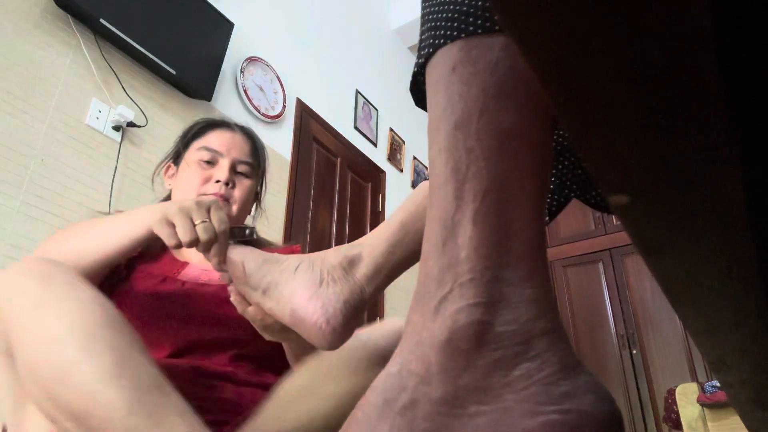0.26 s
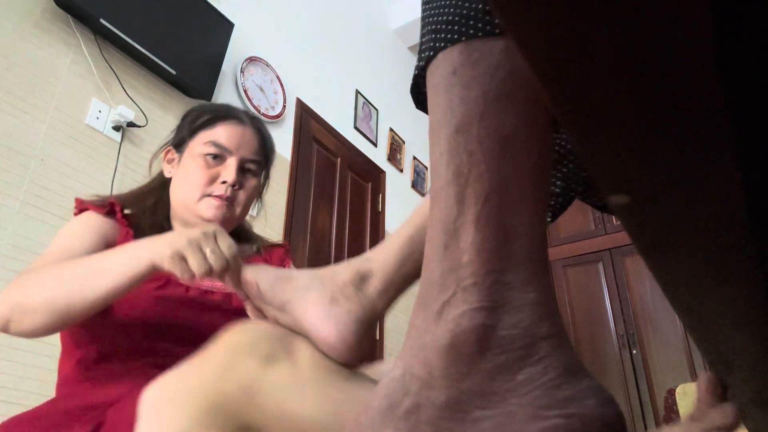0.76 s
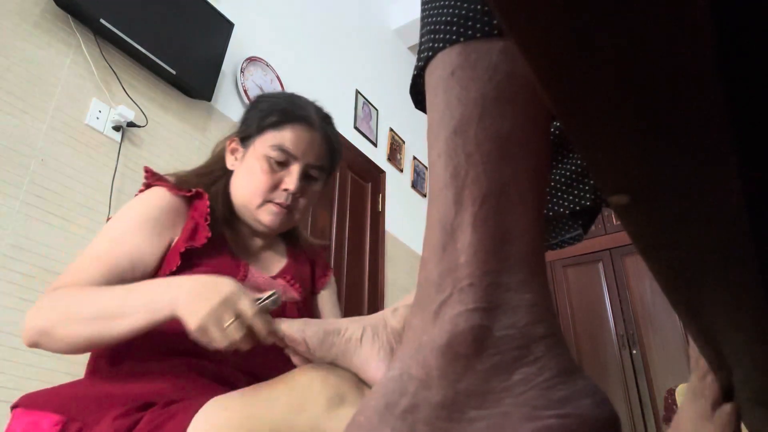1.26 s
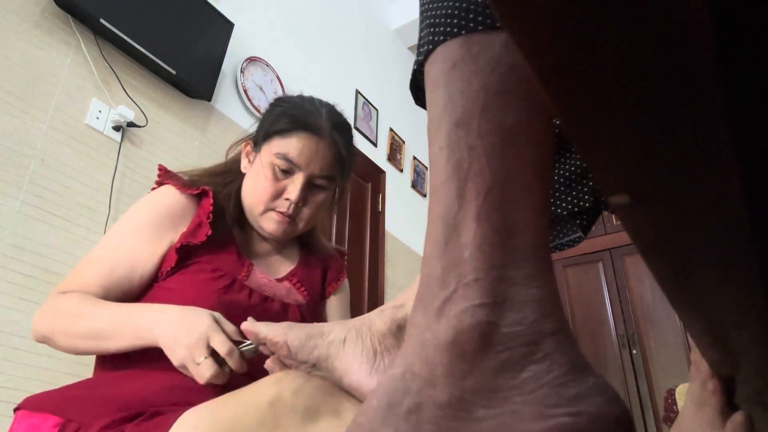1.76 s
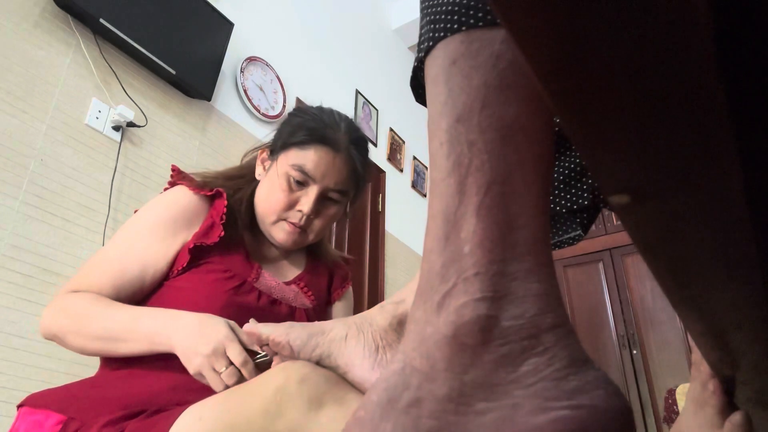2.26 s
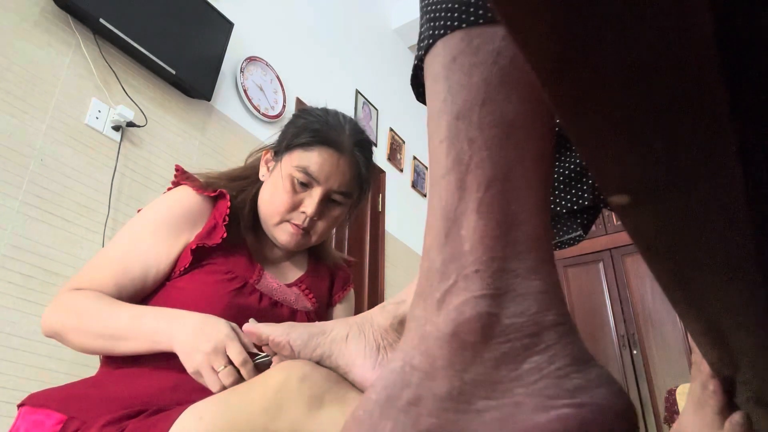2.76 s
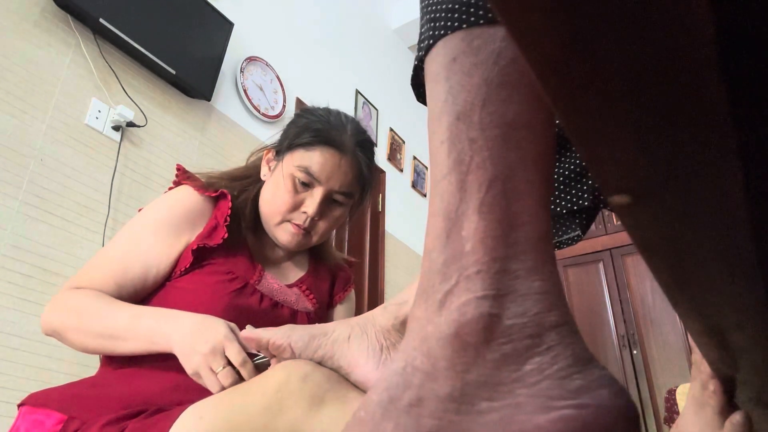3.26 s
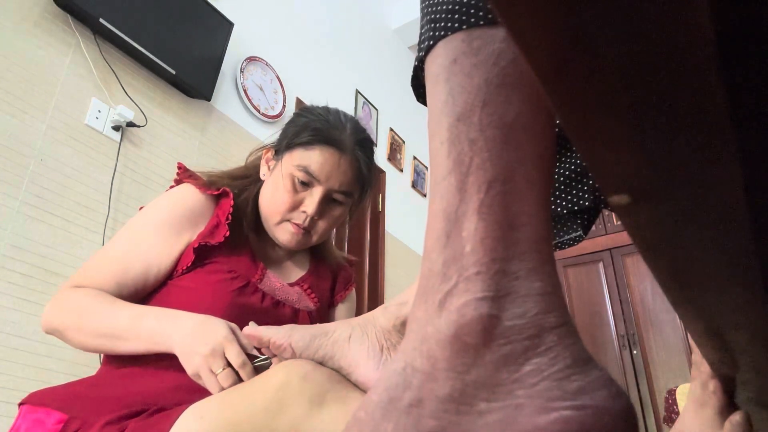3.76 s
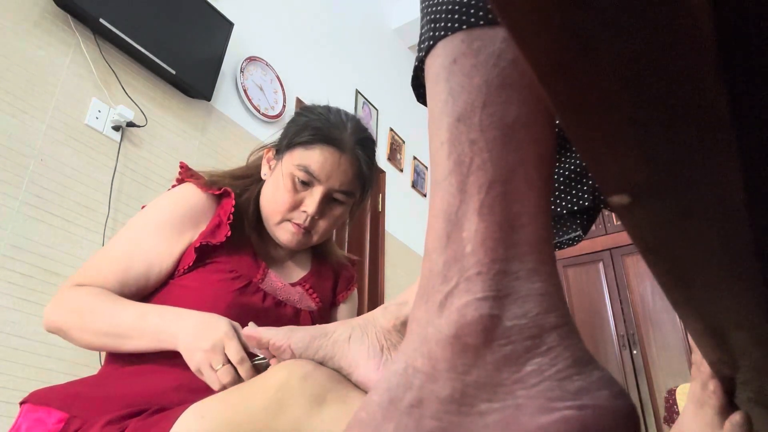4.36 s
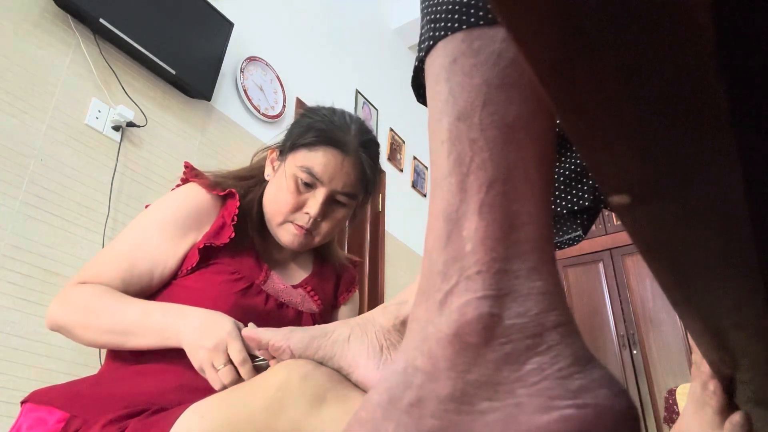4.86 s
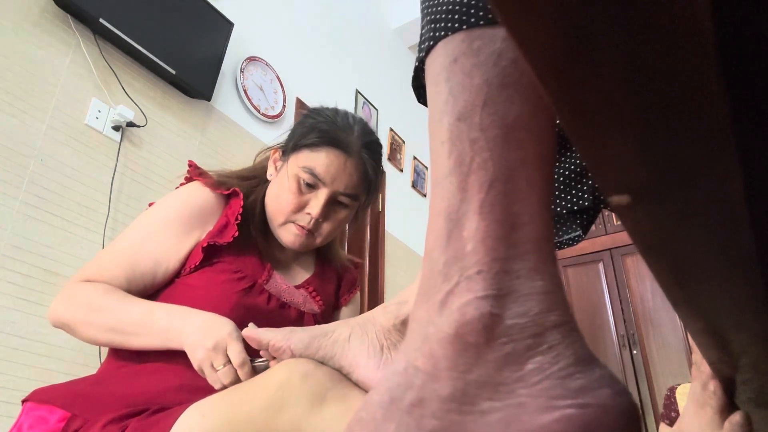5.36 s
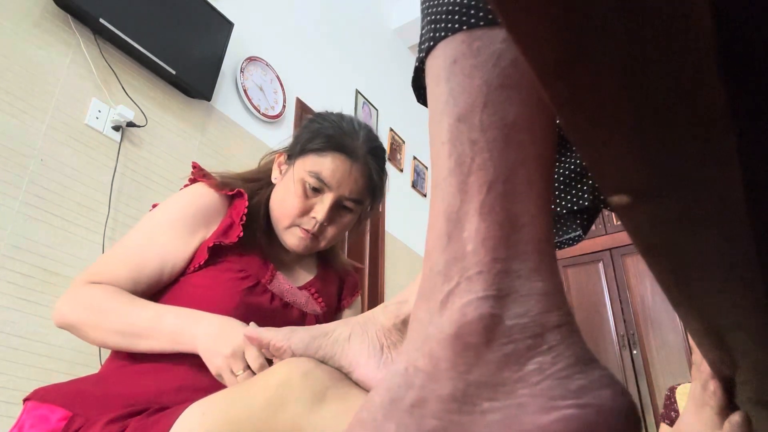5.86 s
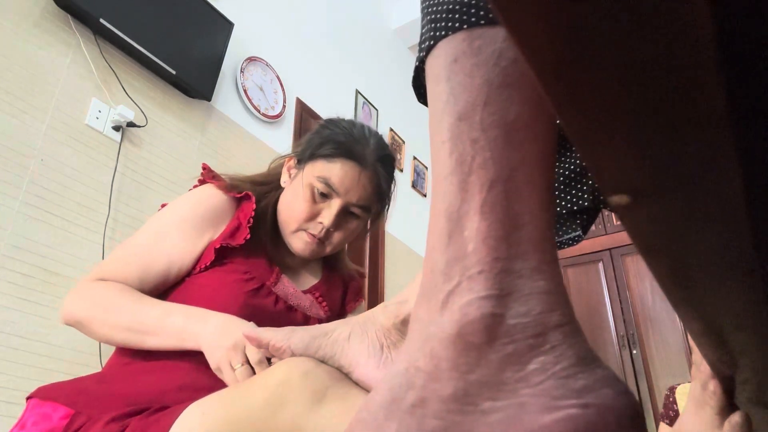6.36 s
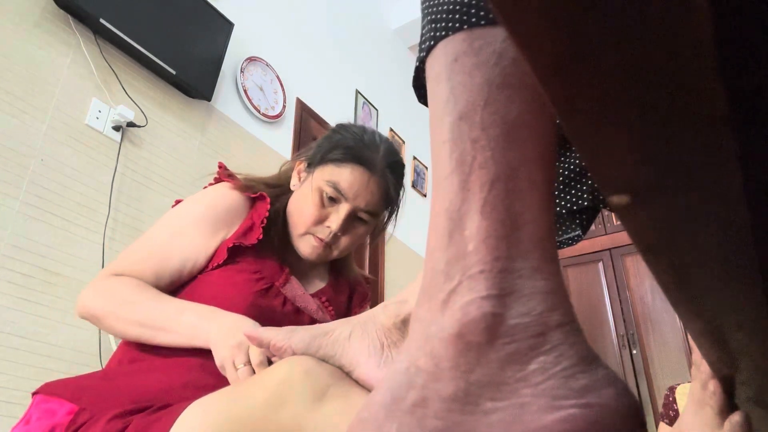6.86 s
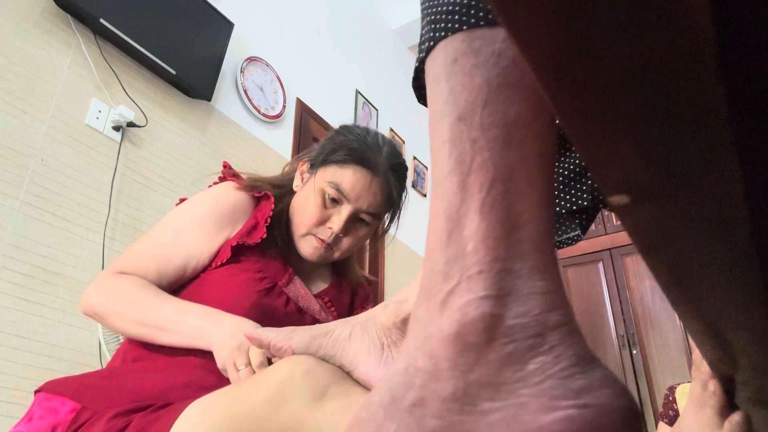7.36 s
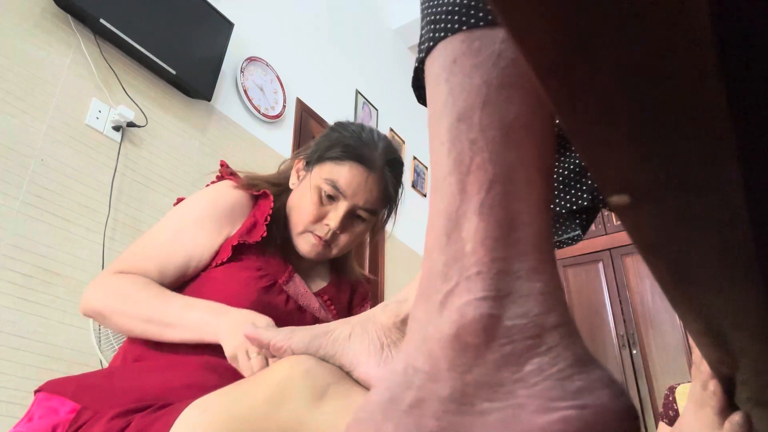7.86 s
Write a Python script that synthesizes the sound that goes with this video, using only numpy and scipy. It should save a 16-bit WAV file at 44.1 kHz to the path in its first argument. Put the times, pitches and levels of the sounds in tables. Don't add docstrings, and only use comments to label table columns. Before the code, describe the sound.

Quiet indoor stereo pickup at floor level: steady fan hum with soft airflow, a wavering pump note and far engines coming and going. Brief cloth rustle and a tiny tick open it. A long calm follows as a lorry's low boom builds outside, then a single dry, piercing snip of toenail clippers dominates everything, its bright reflections fading within about half a second. Low humming remains to the end.

```python
import sys
import numpy as np
from scipy import signal
from scipy.fft import rfft, irfft, next_fast_len
from scipy.io import wavfile
from scipy.ndimage import uniform_filter1d

SR = 44100
rng = np.random.default_rng(int(sys.argv[2]) if len(sys.argv) > 2 else 0)


def boost_factor(decibels):
    exponent = np.asarray(decibels, float) / 20
    return 10 ** exponent


def to_wav(sig):
    pcm = np.clip(np.atleast_2d(sig), -1, 1) * 32767
    pcm = np.round(pcm).astype(np.int16)
    wavfile.write(sys.argv[1], SR, pcm.T)


N = 357410
M = next_fast_len(N, real=True)
HZ = np.arange(M // 2 + 1) * SR / M + 1e-3
T = np.arange(N) / SR

# [f/Hz, likeness 0-1, left minus right/dB, left lead/rad]
PORTS = [(40, 0.95, -1.5, .05), (150, 0.61, -1, 0.46), (305, 0.78, 7.5, 0.82), (560, 0.36, -4.5, 1.14),
         (1300, 0.46, 1.6, 2.09), (2250, 0.4, 0.2, 2.22), (3320, 0.45, -3.5, 5.2), (4550, 0.09, -1.5, 8.4),
         (5840, 0.55, -1.5, 10.06), (7440, 0.71, 5, 8.9), (10220, 0.55, -1.5, 10.75),
         (11560, 0.87, 3, 12.04), (13900, 0.9, -1, 12.5), (15500, .97, 10, 12)]

PUMP_HZ, PUMP_DB, PUMP_OVERTONE_DB = 215.5, -60.5, -75
PUMP_SURGES = [(.3, 0.27, .3, -57), (.88, .12, 0.062, -54), (1.33, .12, .06, -54), (5.45, .07, .15, -53),
               (6.14, 0.22, .15, -54), (6.63, .08, 0.24, -51), (7.2, .12, 0.087, -56),
               (7.58, 0.064, .15, -51.5), (7.82, 0.21, .07, -51), (8.08, 0.067, .3, -49.5)]
# [peak t/s, rise/s, fall/s, level/dB]
PUMP_RATTLES = [(.16, .07, 0.091, -56.5), (.7, .05, .15, -58), (1.15, .08, 0.06, -54.5),
                (5.73, .06, .06, -58), (6.03, 0.064, .12, -57), (6.33, 0.28, 0.18, -56.5),
                (6.88, 0.17, 0.043, -56), (7.2, .1, 0.085, -49), (7.97, 0.18, .12, -53.5)]

LORRY_S, LORRY_HZ, LORRY_HZ_PER_S = 3.2, 57.28, 1.77
# [peak t/s, rise/s, fall/s, level/dB]
LORRY_BOOMS = [
    (3.5, 0.18, 0.1, -44),
    (3.9, 0.13, 0.28, -44.5),
    (4.5, .22, 0.53, -39.5),
    (5.2, 0.58, 1.27, -36),
    (6.42, 0.25, 0.17, -39),
    (6.85, 0.11, 0.17, -44.5),
    (8.0, 0.41, 1.5, -35.5),
]
# [peak t/s, rise/s, fall/s, level/dB]
LORRY_OVERTONE = [
    (4.6, 1, 1.1, -54),
    (6.1, 0.44, 1.1, -46),
    (6.8, 0.46, 0.54, -48),
    (8.1, 0.24, 1.5, -56),
]

VAN_HZ = 160.8
# [peak t/s, rise/s, fall/s, level/dB, f/Hz]
PASSING = [
    (0.37, .1, 0.37, -48.5, 50),
    (0.35, 0.27, 0.18, -50, 80),
    (0.52, 0.13, 0.24, -47.5, 77.6),
    (0.91, .2, 0.23, -41.5, 80),
    (2.08, 0.12, .4, -46.5, 46.5),
    (2.62, 0.62, 0.88, -47.5, 97),
    (2.2, 0.38, 0.86, -49, VAN_HZ),
    (3.16, 0.93, 0.88, -49.5, VAN_HZ),
]

# [f/Hz, level/dB, wobble/dB, left minus right/dB, left lead/rad]
FAN_LINES = [(100.4, -51, 1, -1.5, 0.75), (199.4, -61, 2.5, -9.5, 0.6), (268, -59, -4, 2, 0.7),
             (301.8, -54.5, 2, 0.5, 0.66), (319.5, -49, 0.67, 5.5, 1.13), (539, -60.5, 2, 0, 3.5),
             (593.6, -69, 2.5, -13, 0.6)]
BLADE_HZ = 283.8
BLADE_LEVEL = [(0, -51.5), (1.2, -58.5), (1.6, -52), (3.9, -55), (5.1, -51.5), (8.1, -50)]
# [f/Hz, density/dB per Hz]
AIR = [(25, -79), (33, -69), (44, -68.5), (55, -61.5), (90, -65.5), (180, -71.5), (240, -77.5),
       (330, -75.5), (500, -79), (1300, -83.5), (2200, -93), (4500, -102), (7000, -101), (9500, -106),
       (12000, -105), (15600, -110)]
RUSH_LOW_S, RUSH_DB_PER_S2 = 3.86, 0.0608

# [peak t/s, rise/s, fall/s, level/dB]
SLIDES = [
    (0, .1, 0.11, -55.5),
    (.4, 0.13, .1, -67),
    (.72, 0.16, .2, -62),
    (6.0, .25, 4.0, -67),
]
# [f/Hz, density/dB per Hz]
CLOTH = [(600, -55), (1500, -30), (3000, -38), (6000, -45), (9000, -44), (13000, -43.5), (15700, -48),
         (16000, -70)]

# [t/s, peak level/dB, f/Hz]
TICKS = [
    (.0217, -33, 12500),
    (.086, -51, 13000),
]

# [t/s, peak level/dB]
SNIP = (5.2642, -0.85)
# [f/Hz, level/dB, t60/s]
JAWS = [(7330, -32, 0.012), (8600, -13, .0045), (10150, -13.5, .0023), (11660, -22.5, 0.0056),
        (13200, 0, 0.0028), (13800, 3, 0.0044), (14540, -15, 0.0042), (15900, -27, .0032),
        (13800, -29, .02)]
# [f/Hz, level/dB, t60/s]
LEVER = [(2200, -0.5, 0.023), (1560, -6, 0.009), (2980, -9, 0.0049), (3850, -6, 0.005), (4500, -6, 0.004),
         (5600, -5, 0.0035)]
# [f/Hz, density/dB per Hz]
ECHO = [(1500, -18), (2700, -18), (4000, -14.5), (5600, -15.5), (7000, -16), (8000, -3), (9500, -8),
        (12400, -2.5), (13900, 9), (14600, -9), (14900, -40)]
ECHO_DB, ECHO_GAP_S, ECHO_SWELL_S, ECHO_T60_S = -23, 0.0097, 0.06, 0.57


def on_hz(table, column):
    rows = np.array(table, float)
    return np.interp(np.log(HZ), np.log(rows[:, 0]), rows[:, column])


def walk(rate_hz):
    hold = int(SR / rate_hz)
    steps = np.repeat(rng.standard_normal(N // hold + 1), hold)
    return 1.18 * uniform_filter1d(uniform_filter1d(steps, hold), hold)[:N]


def swells(rows, floor_db=-150):
    power = boost_factor(2 * floor_db)
    for peak_s, rise_s, fall_s, db in rows:
        width_s = np.where(T < peak_s, rise_s, fall_s)
        power = power + boost_factor(2 * db) * np.exp(-2 * ((T - peak_s) / width_s) ** 2)
    return 10 * np.log10(power)


def ports(shared, diffuse=None):
    side = np.array([[.5], [-.5]])
    wave = rfft(shared, M) * np.exp(1j * side * on_hz(PORTS, column=3))
    if diffuse is not None:
        like = np.clip(on_hz(PORTS, column=1), 0, 1)
        wave = np.sqrt(like) * wave + np.sqrt(1 - like) * rfft(diffuse, M)
    return irfft(wave * boost_factor(side * on_hz(PORTS, column=2)), M)[:, :N]


def wash(colour, envelope):
    noise = rng.standard_normal((3, N)) * envelope
    gain = boost_factor(on_hz(colour, column=1)) * np.sqrt(SR / 2)
    noise = irfft(rfft(noise, M) * gain, M)[:, :N]
    return ports(noise[0], noise[1:])


def tone(hz, db, pan_db, lead_rad):
    side = np.array([[.5], [-.5]])
    phase = 2 * np.pi * np.cumsum(hz) / SR + side * lead_rad + 2 * np.pi * rng.random()
    return np.sqrt(2) * boost_factor(db + side * pan_db) * np.sin(phase)


def struck(at_s, modes, rise_s):
    start = int(at_s * SR)
    t = np.maximum(T - at_s, 0)[start:][:SR // 20]
    ring = 0
    for k, (hz, db, t60_s) in enumerate(modes):
        ring = ring + (-1) ** k * boost_factor(db - 60 * t / t60_s) * np.sin(2 * np.pi * hz * t)
    push = np.sin(np.pi / 2 * np.minimum(t / rise_s, 1)) ** 2
    out = np.zeros(N)
    out[start:][:len(t)] = ring * push
    return out / np.abs(out).max()


def pump():
    hz = PUMP_HZ + 0.813 * walk(4)
    note = tone(hz, swells(PUMP_SURGES, PUMP_DB) + 1.5 * walk(8), 1.6, 0.35)
    rattle = tone(2 * hz, swells(PUMP_RATTLES, PUMP_OVERTONE_DB) + 1.1 * walk(8), 1.6, .39)
    return note + rattle


def lorry():
    hz = LORRY_HZ + LORRY_HZ_PER_S * (T - LORRY_S)
    boom = tone(hz, swells(LORRY_BOOMS) + .64 * walk(9), 2.7, 0.35)
    overtone = tone(2 * hz, swells(LORRY_OVERTONE) + .64 * walk(14), 4.1, 0.21)
    return boom + overtone


def traffic():
    out = 0
    for hz in sorted({row[4] for row in PASSING}):
        level_db = swells([row[:4] for row in PASSING if row[4] == hz]) + 0.74 * walk(8.8)
        out = out + tone(hz + 0.29 * walk(3.1), level_db, .045 * (hz - 70), 0.16)
    return out


def fan():
    lines = 0
    for hz, db, wobble_db, pan_db, lead_rad in FAN_LINES:
        lines = lines + tone(hz + 0.412 * walk(2.02), db + wobble_db * walk(6), pan_db, lead_rad)
    blade_db = np.interp(T, *np.transpose(BLADE_LEVEL)) + 1.6 * walk(9)
    blade = tone(BLADE_HZ + 0.611 * walk(3), blade_db, 1.4, .12)
    rush_db = RUSH_DB_PER_S2 * (T - RUSH_LOW_S) ** 2 - 0.29 + 0.27 * walk(2.2) + .5 * walk(12)
    return lines + blade + wash(AIR, boost_factor(rush_db))


def rustle():
    grains = boost_factor(swells(SLIDES) + 0.87 * walk(65) + 2.0 * walk(400))
    return wash(CLOTH, grains)


def ticks():
    clicks = 0
    for at_s, db, hz in TICKS:
        modes = [(hz, 0, .003), (.8 * hz, -3, .003), (1.13 * hz, -1, .003), (1.1 * hz, -1, .002)]
        clicks = clicks + boost_factor(db) * struck(at_s, modes, rise_s=.0002)
    return ports(clicks)


def snip():
    at_s, peak_db = SNIP
    t = np.maximum(T - at_s, 0)
    clap = boost_factor(peak_db) * ports(struck(at_s, JAWS, rise_s=0.00057))
    knock = boost_factor(-35.5) * struck(at_s, LEVER, rise_s=0.00041)
    early = boost_factor(-6) * (t > 0) * np.exp(-t / 0.0088)
    fall_db = -60 * t / ECHO_T60_S - 60 * (t / 1.0) ** 2
    arrival = np.clip((t - ECHO_GAP_S) / .0015, 0, 1)
    swell = 1 - 0.7 * np.exp(-t / ECHO_SWELL_S)
    late = arrival * swell * boost_factor(fall_db + .6 * walk(150))
    echo = wash(ECHO, early + late) * boost_factor(ECHO_DB - 43)
    return clap + knock + echo


def scene():
    return pump() + lorry() + traffic() + fan() + rustle() + ticks() + snip()


def roll_off(x):
    return signal.sosfilt(signal.butter(12, 16880, fs=SR, output="sos"), x)


def record(dry):
    dry = signal.sosfilt(signal.butter(2, 25, "high", fs=SR, output="sos"), dry)
    dry = signal.sosfilt(signal.butter(12, 16600, fs=SR, output="sos"), dry)
    after = T - SNIP[0] - .003
    duck_db = -5 * (after > 0) * np.exp(-np.abs(after) / 0.009)
    return roll_off(dry * boost_factor(duck_db))


dry = scene()
out = record(dry)
to_wav(out)
```